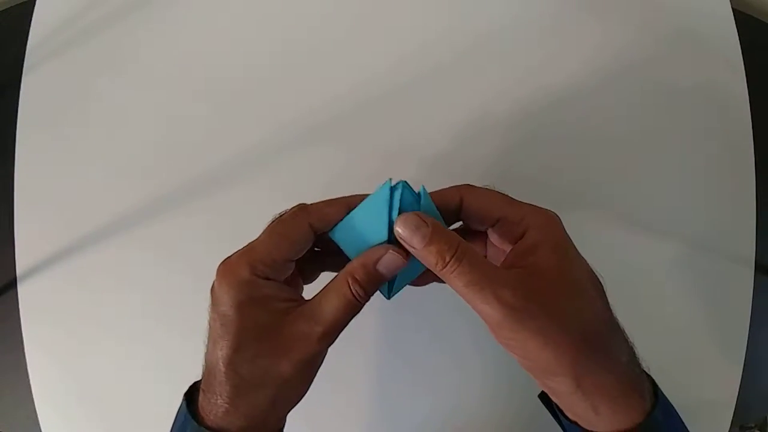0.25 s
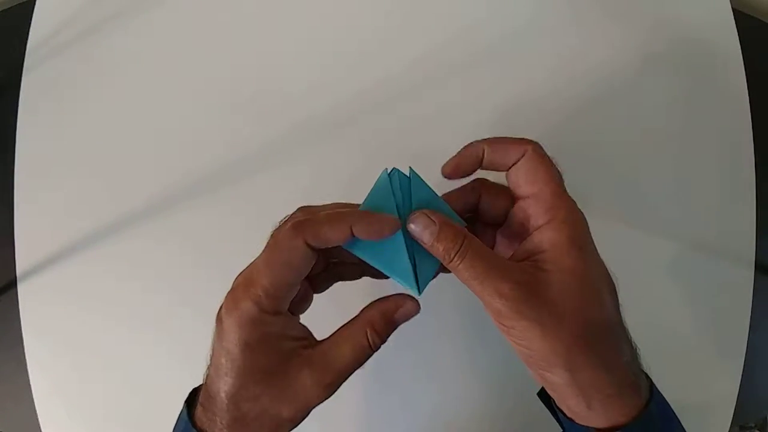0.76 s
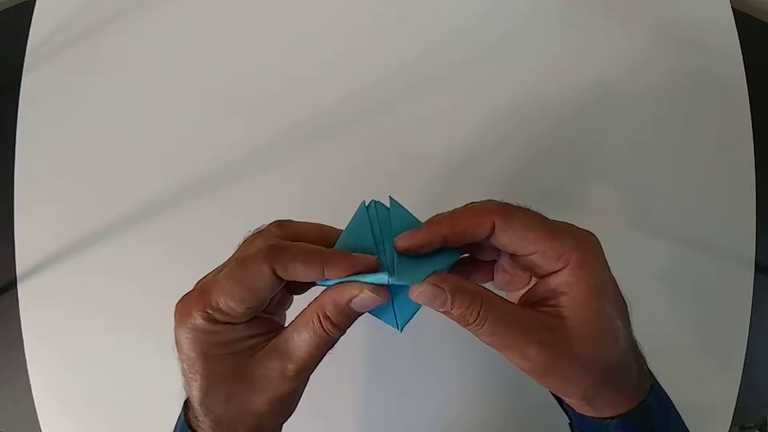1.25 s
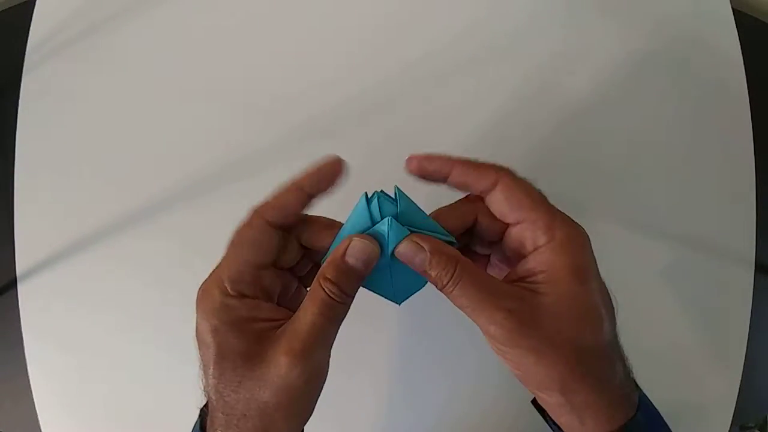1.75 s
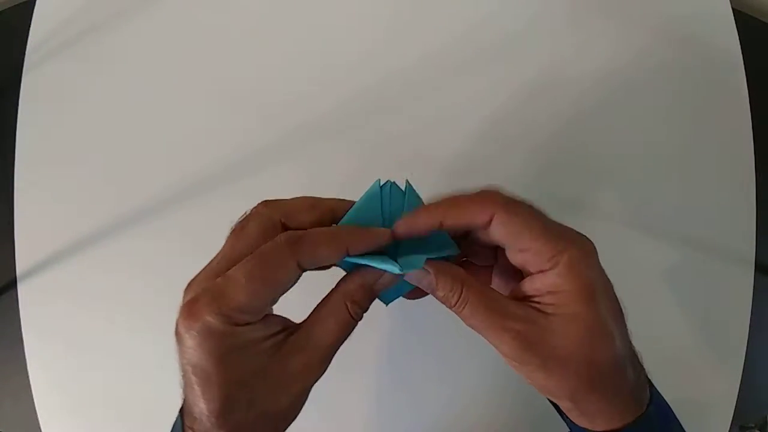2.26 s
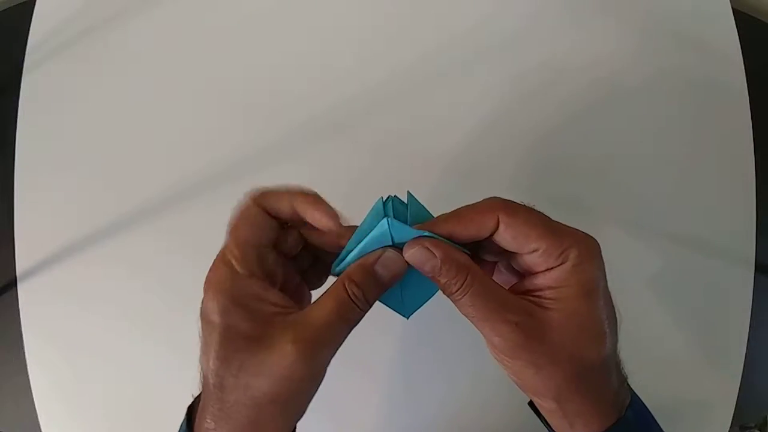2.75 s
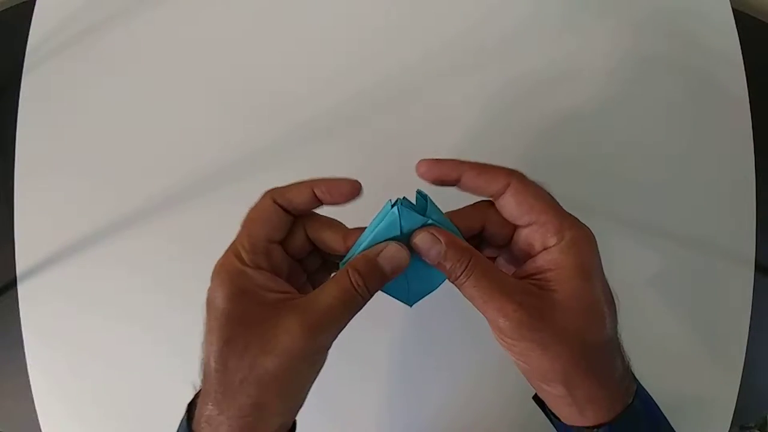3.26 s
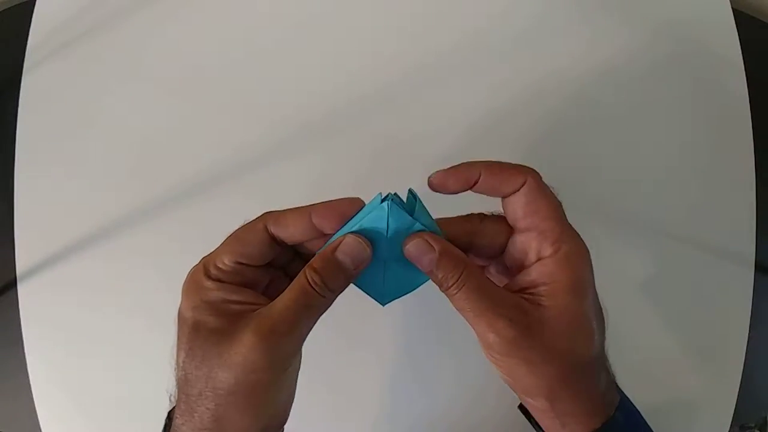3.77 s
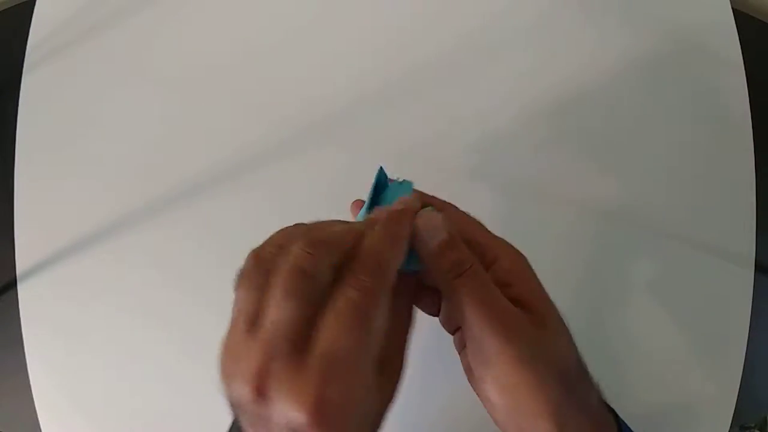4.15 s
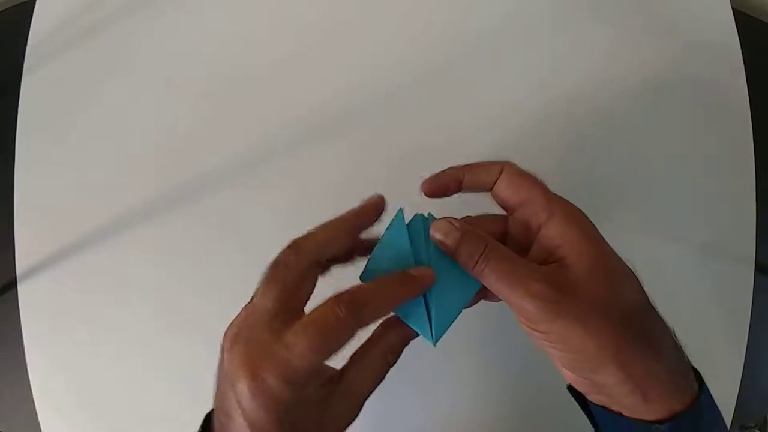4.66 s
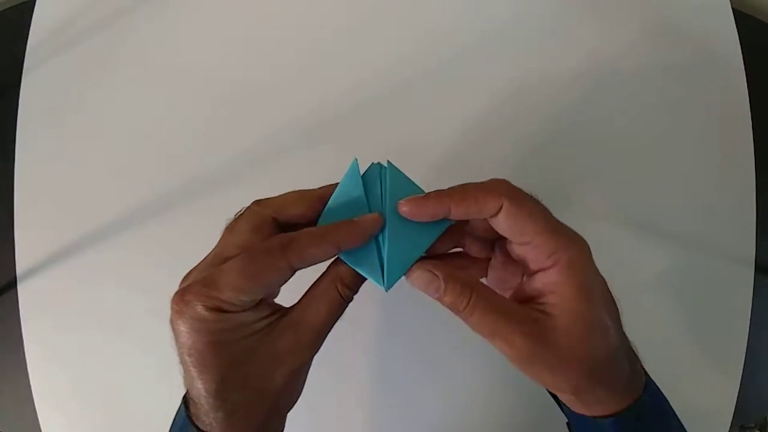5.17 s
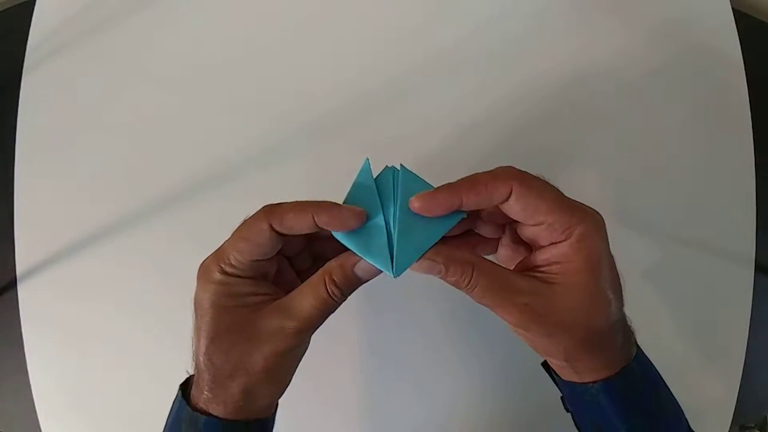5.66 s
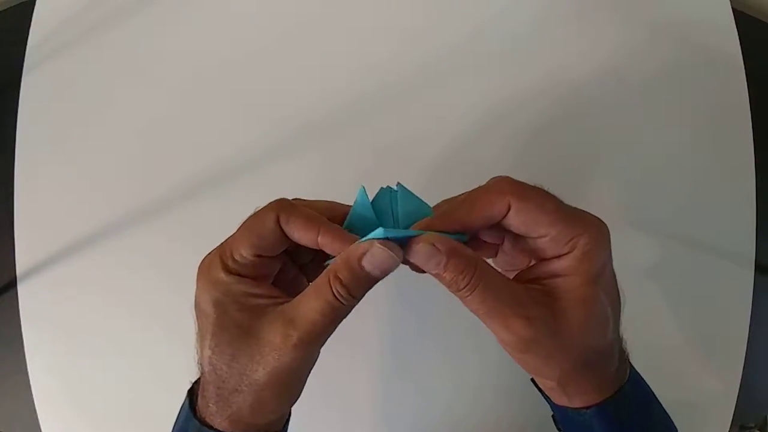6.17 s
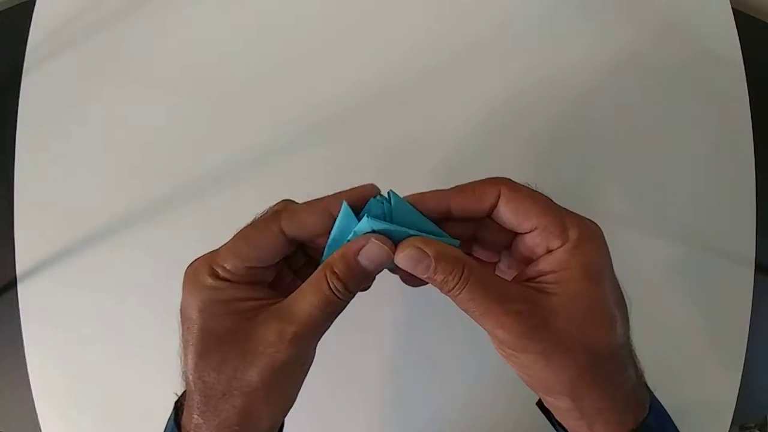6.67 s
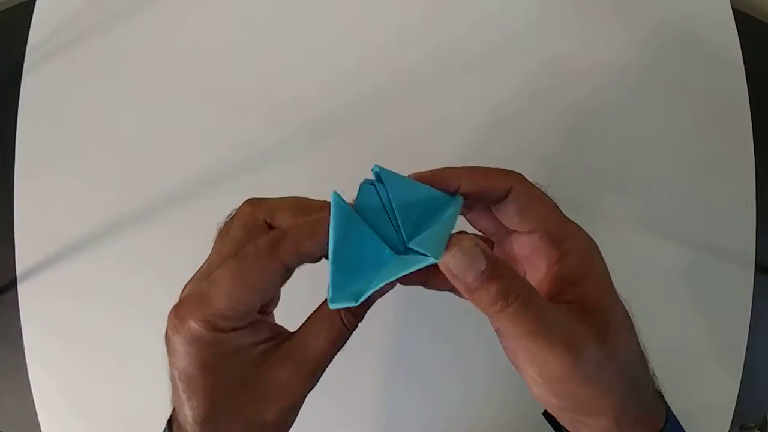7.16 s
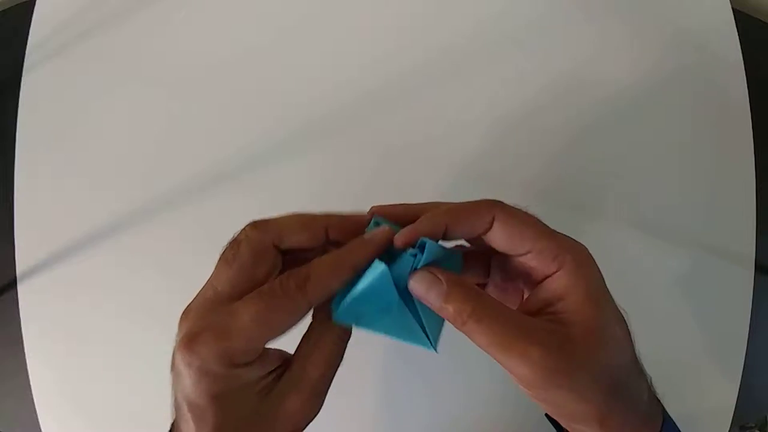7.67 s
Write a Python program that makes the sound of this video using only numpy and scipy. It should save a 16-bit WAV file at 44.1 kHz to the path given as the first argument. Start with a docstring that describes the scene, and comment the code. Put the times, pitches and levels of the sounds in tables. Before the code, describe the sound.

A small piece of stiff paper is folded by hand just above a table. It gives short, crisp snaps and tiny crackles at uneven intervals, with soft swishes of fingertips sliding along the creases in between. Three sharper snaps stand out in the first half and another comes later, followed by a faint creak and more light rustling. The microphone is close overhead in a quiet, furnished room with faint ventilation rumble and hiss.

```python
"""A small sheet of stiff paper snaps and swishes as two hands fold it just above a table in a quiet room.
Buckling panels excite damped modes of the sheet; friction of fingertips along the creases makes the swish.
One slow squeeze creaks. The table reflects the sound and the furnished room adds a short reverberation.
Two microphone ports a few centimetres apart listen from above, the left with a bright resonance,
over faint ventilation rumble, mains hum and hiss."""
import sys
import numpy as np
from scipy import signal
from scipy.fft import rfft, irfft, next_fast_len
from scipy.io import wavfile

SR = 44100
rng = np.random.default_rng(int(sys.argv[2]) if len(sys.argv) > 2 else 0)


def file_out(sig):
    """Save sig as 16-bit WAV at sys.argv[1]."""
    # one column per channel
    cols = np.atleast_2d(sig).T
    # limit, then scale
    lim = np.clip(cols, -1, 1)
    pcm = np.round(lim * 32767).astype(np.int16)
    wavfile.write(sys.argv[1], SR, pcm)


N = 349272

# Buckling events: start_s, panel_db, panel_pitch_hz, thud_db, flap_db, crack_db, tick_db, left_over_right_db
BUCKLES = [(0.0922, -38, 1550, -49.5, -46, -52.5, -58, 1), (0.452, -10.5, 1620, -35, -9, -17, -10, 2.5),
           (0.7758, -50, 1530, -57, -69, -65, -64, 0.0), (0.9183, -34.5, 1787, -57, -63.5, -65, -62, 0),
           (0.9664, -44, 2020, -74, -43.0, -45, -33, 5),
           (1.2059, -31.5, 1420, -36.5, -42, -42.5, -54, -0.5), (1.286, -63.5, 1600, -54, -69, -60, -71, 2),
           (1.331, -54, 1570, -55.5, -55.5, -56, -50, 0), (1.4995, -57, 2156, -68.5, -46, -56.5, -70, 3),
           (1.7527, -47, 1310, -33.5, -48.5, -38.5, -61, 3.5),
           (1.777, -12, 2270, -41.5, -12.5, -26, -35, 3), (2.3071, -38.5, 1760, -52.5, -43, -45, -60, 0),
           (2.6375, -58.5, 1210, -57.5, -62.5, -71, -77, 2),
           (2.6629, -52.5, 1126, -53, -63.5, -68, -74, 3.5), (2.677, -53, 2180, -73, -53, -67, -62, -6),
           (2.7443, -57, 1970, -88, -52.5, -48, -65, -5.5), (2.794, -51, 1880, -48.5, -35, -44.5, -49, 0),
           (2.856, -48.0, 1990, -53, -38.5, -43, -49, 4), (2.934, -34, 2325, -43, -12, -5.5, -18.5, 4),
           (3.1935, -64, 1850, -81, -61, -59, -47.5, 2.5), (3.2833, -57.0, 1304, -48, -64, -60, -64, 1),
           (3.676, -34.5, 2360, -54.5, -42.5, -42, -47.5, -0.5),
           (3.7599, -51, 2150, -64, -40, -43, -53.0, 7), (3.9694, -48, 1360, -59, -55, -68, -64.5, 0),
           (3.9944, -63, 2420, -74.5, -43.5, -59, -55, 2), (4.0112, -48, 1694, -57.5, -38.5, -66, -66.0, 0),
           (4.3795, -61, 1950, -57, -41, -53, -62, 1), (4.6075, -48.5, 2170, -57, -66, -64, -51.5, -2),
           (4.7748, -45.5, 2160, -68, -52.0, -58, -59, 1.5),
           (4.8497, -35, 2180, -45, -27.5, -39, -42.5, -1), (4.8742, -32.5, 2090, -68, -34, -39, -43, 1),
           (5.3172, -44, 1885, -48, -52, -59.5, -58, 9), (5.816, -23, 1705, -38, -18, -12, -6, 3.5),
           (5.978, -24, 2365, -79, -39, -60, -64, 1.5), (6.0196, -77, 2170, -85.0, -51, -49, -48.5, 0),
           (6.52, -42.5, 2020, -44.5, -32.5, -26, -28.5, 14.5), (6.5667, -58, 2300, -69, -40, -40, -54, -6),
           (6.6352, -51, 2020, -51, -47, -57, -57, 2), (6.677, -52, 2030, -68, -56, -46, -47, 0.5),
           (6.7792, -70, 2287, -86, -35, -30.5, -32.5, 6.5),
           (7.0746, -28, 2023, -46.5, -29.5, -51.5, -51.5, 0.5), (7.543, -58, 1400, -48, -60, -61, -57, 2),
           (7.692, -56, 1290, -47.5, -64, -66, -66, 3)]
# Modes of the large panel: pitch_ratio, level_db
LARGE_PANEL_MODES = [(.85, -14.5), (1.0, -4), (1.2, -7)]
# Modes of small flaps, stiff creases, the bright tick high in the treble, and sheet and fingers as a # whole:
# pitch_hz, level_db
SMALL_FLAP_MODES = [(2700, -10), (3100, -2), (3600, -7.5), (4200, -8.5)]
CREASE_MODES = [(4800, -10), (5400, -2), (6100, 0), (6900, -9)]
TICK_MODES = [(8200, -8.5), (9100, 0), (9700, -10.5), (12200, -27), (14500, -23)]
WHOLE_SHEET_MODES = [(110, -22.5), (260, -18), (560, -8.5), (850, -9.5)]
RING_CYCLES, THUD_CYCLES = 14, 6
BUCKLE_LEAD_S = .00012   # the flip begins just before the snap is loud
SPOT_SPREAD_S = .00009   # modes radiate from different spots, so their travel times differ
SHEET_CUT_HZ = 946


def buckling_snaps(events):
    """Snap-through buckling: a panel flips in a stutter of slips that excites the sheet's modes."""
    start_s, panel_db, panel_hz, thud_db, flap_db, crack_db, tick_db, pan_db = events.T
    onsets = np.round((start_s - BUCKLE_LEAD_S) * SR).astype(int)
    port_gains = from_db(np.outer([.5, -.5], pan_db))
    ring_samples, thud_samples = 600, 2000
    slips = np.zeros((len(events), thud_samples))
    slips[:, 0] = 1
    late = rng.random((len(events), 160)) < .08   # smaller slips follow and die out within a few ms
    slips[:, 4:164] = late * rng.normal(0, .25, late.shape) * np.exp(-np.arange(160) / 45)
    slips /= np.linalg.norm(slips, axis=1, keepdims=True)
    spot_lags = rng.uniform(0, SPOT_SPREAD_S * SR, (len(events), 2, 16)).round().astype(int)
    sheet, thuds = np.zeros((2, 2, N + thud_samples))
    for k, slip in enumerate(slips):
        modes = [(ratio * panel_hz[k], db + panel_db[k]) for ratio, db in LARGE_PANEL_MODES]
        modes += [(hz, db + flap_db[k]) for hz, db in SMALL_FLAP_MODES]
        modes += [(hz, db + crack_db[k]) for hz, db in CREASE_MODES]
        modes += [(hz, db + tick_db[k]) for hz, db in TICK_MODES]
        for m, (hz, db) in enumerate(modes):
            ringing = from_db(db) * paper_mode(slip[:ring_samples], hz, RING_CYCLES)
            for port in (0, 1):
                start = onsets[k] + spot_lags[k, port, m]
                sheet[port, start:start + ring_samples] += port_gains[port, k] * ringing
        thud = sum(from_db(db + thud_db[k]) * paper_mode(slip, hz, THUD_CYCLES)
                   for hz, db in WHOLE_SHEET_MODES)
        thuds[:, onsets[k]:onsets[k] + thud_samples] += port_gains[:, k:k + 1] * thud
    # acoustic short circuit: air flows round the edges of a small panel, so it radiates little bass
    bass_cut = signal.butter(3, SHEET_CUT_HZ, "high", fs=SR, output="sos")
    return (signal.sosfilt(bass_cut, sheet + 1e-18) + thuds)[:, :N]


def paper_mode(clicks, hz, cycles):
    """Two equal resonators in cascade, each losing 60 dB in `cycles`: an impulse swells to about 1."""
    t60_s = cycles / hz
    unit_peak = 2 * np.e * np.log(1000) / (t60_s * SR)
    return unit_peak * resonator(resonator(clicks, hz, t60_s), hz, t60_s)


def resonator(clicks, hz, t60_s):
    """Damped harmonic oscillator: each impulse starts an exponentially decaying sine."""
    radius, angle = from_db(-60 / (t60_s * SR)), 2 * np.pi * hz / SR
    return signal.lfilter([0, np.sin(angle)], [1, -2 * radius * np.cos(angle), radius ** 2], clicks + 1e-18)


# One tick of the creak: panel_db, panel_pitch_hz, thud_db, flap_db, crack_db, tick_db, left_over_right_db
CREAK_BUCKLE = (-59, 1452.5, -57, -62, -72.5, -71.5, 4.5)


def creak_events(start_s=6.33, ticks=10, gap_s=.018, unevenness=.35, spread_db=1.5):
    """Quasi-periodic buckling: a slowly squeezed fold gives a row of small snaps, uneven in gap and level."""
    chance = rng.uniform(-1, 1, (ticks, 2))
    times_s = start_s + gap_s * (np.arange(ticks) + unevenness * chance[:, 0])
    is_level = np.array([1, 0, 1, 1, 1, 1, 0])
    return np.column_stack([times_s, CREAK_BUCKLE + spread_db * chance[:, 1:] * is_level])


# Finger strokes: full_pressure_s, swell_s, hold_s, fade_s, hiss_db, body_db, rumble_db, sheen_db
FINGER_STROKES = [(0, .05, 0.049, 0.26, -57.5, -60.5, -64, -66),
                  (.097, 0.1, 0.00079, 0.06, -71, -58, -55, -57.5),
                  (.185, 0.039, 0.023, 0.1, -64.5, -56.5, -63, -60.5),
                  (0.419, 0.094, 0.025, 0.56, -60, -51, -66, -58.5),
                  (0.663, 0.1, 0.073, 0.053, -57.5, -61.5, -108, -54.5),
                  (0.79, 0.078, 0, 0.04, -88, -67, -62.5, -66),
                  (0.933, 0.013, 0.02, 0.13, -67, -57, -69.5, -65),
                  (1.015, 0.1, 0.0082, 0.048, -56.5, -48.5, -68.5, -53.5),
                  (1.243, 0.079, 0, 0.0087, -71, -60, -60, -65),
                  (1.341, 0.019, 0.0023, 0.039, -71, -69, -73, -64),
                  (1.433, .013, 0.031, 0.032, -57.5, -64.5, -91, -57),
                  (1.644, 0.016, 0.11, 0.05, -57, -64.5, -73.5, -55),
                  (1.75, 0.051, 0.024, 0.31, -78, -67, -67, -87),
                  (1.859, 0.11, 0, 0.065, -66, -57.5, -64.5, -71),
                  (1.976, 0.12, 0.014, 0.039, -63, -65, -100, -62.5),
                  (2.049, 0.012, 0.027, 0.091, -59.5, -60.5, -84, -56),
                  (2.13, 0.031, 0.003, 0.052, -57, -59.5, -74, -60),
                  (2.169, .01, 0.047, 0.025, -74, -69, -68.5, -74.5),
                  (2.251, 0.016, 0.076, .11, -61.5, -60, -72, -60),
                  (2.678, 0.039, 0, 0.1, -73, -69, -67, -82),
                  (2.794, 0.027, 0.0038, 0.028, -50.5, -52, -59.5, -51.5),
                  (2.92, 0.06, 0.02, 0.044, -43.5, -43, -66, -45),
                  (3.016, .05, 0, 0.065, -55.5, -80.5, -95, -88),
                  (3.196, .04, 0.0016, .3, -81, -86, -73, -80),
                  (3.349, 0.039, 0.011, 0.18, -74, -72.5, -80.5, -72.5),
                  (3.411, 0.076, 0, 0.21, -69, -71, -71.5, -61.5),
                  (3.601, 0.072, 0.0064, 0.015, -60, -65.5, -67.5, -65.5),
                  (3.69, 0.029, 0.026, 0.048, -50.5, -53, -68.5, -58.5),
                  (3.764, 0.041, 0, 0.02, -46.5, -50.5, -58.5, -48),
                  (4.014, 0.038, 0, 0.025, -60.5, -57.5, -60, -57),
                  (4.131, 0.037, .03, .1, -74.5, -73.5, -77, -73),
                  (4.188, 0.026, 0.011, 0.16, -67, -64, -65, -59.5),
                  (4.318, 0.065, 0.0055, 0.049, -49.5, -46.5, -77, -48.5),
                  (4.418, 0.033, 0.0052, 0.073, -87, -55.5, -67.5, -61.5),
                  (4.513, .07, 0.002, 0.057, -52.5, -53, -74, -55),
                  (4.604, 0.057, 0, 0.14, -65.5, -60.5, -73, -68),
                  (4.709, 0.32, 0.0046, 0.023, -74.5, -65.5, -80.5, -71),
                  (4.778, 0.025, 0.0023, 0.034, -77, -64, -67, -72),
                  (4.856, 0.0084, 0.0038, 0.12, -58, -47.5, -60, -70),
                  (4.897, 0.034, 0, 0.12, -52.5, -47.5, -63.5, -53),
                  (4.979, 0.076, 0.092, 0.053, -61.5, -65.5, -70.5, -62.5),
                  (5.196, 0.066, 0, 0.097, -74.5, -76, -66, -79.5),
                  (5.309, 0.018, 0, 0.081, -50.5, -56.5, -65.5, -52),
                  (5.39, 0.054, 0.087, 0.071, -74, -73, -82.5, -78),
                  (5.702, .06, 0.0024, 0.078, -84, -69.5, -89.5, -72),
                  (5.814, 0.0054, 0.068, 0.036, -54, -50.5, -67, -46.5),
                  (5.939, 0.19, 0, 0.19, -62.5, -74, -77, -66),
                  (6.084, 0.012, 0, 0.017, -54.5, -57.5, -78, -52),
                  (6.163, 0.013, 0.0013, 0.046, -56.5, -76, -78, -52),
                  (6.191, 0.031, 0.0027, 0.023, -54, -51, -57, -46.5),
                  (6.509, 0.022, 0.021, 0.017, -43.5, -48, -56.5, -44.5),
                  (6.544, 0.11, 0.029, 0.033, -61, -58, -75, -70),
                  (6.638, 0.013, 0, 0.087, -64, -77, -72, -66),
                  (6.751, 0.027, 0.013, 0.051, -65.5, -60.5, -67, -65),
                  (7.083, .05, 0.048, 0.024, -49, -57, -64, -52),
                  (7.18, .05, 0.065, 0.12, -73.5, -79, -75, -62),
                  (7.21, 0.043, 0, .03, -82, -75.5, -65, -79),
                  (7.34, 0.07, 0, 0.042, -57, -66.5, -98.5, -57),
                  (7.479, 0.026, 0.024, 0.054, -50, -55.5, -67.5, -58.5),
                  (7.542, 0.041, 0, 0.019, -77, -62.5, -63.5, -57.5),
                  (7.64, .06, 0.13, 0.28, -82, -71, -73, -85),
                  (7.752, 0.08, 0.004, 0.017, -52.5, -66, -75, -51),
                  (7.801, 0.026, 0, 0.092, -72.5, -88, -77.5, -71.5)]
# Fingers merely holding the sheet: hiss_db, body_db, rumble_db, sheen_db
HOLDING_LEVELS = (-85, -85.5, -88, -87)


def stroke_envelopes(edge_db=20, edge_curve=1.03, shortest_s=.004):
    """Incoherent addition: strokes swell and fade by edge_db in their set times and sum in power."""
    t = np.arange(0, N + 64, 64) / SR
    full_s, swell_s, hold_s, fade_s, *levels_db = np.transpose(FINGER_STROKES)[..., None]
    early = np.maximum(full_s - t, 0) / np.maximum(swell_s, shortest_s)
    late = np.maximum(t - full_s - hold_s, 0) / np.maximum(fade_s, shortest_s)
    shape = from_db(-edge_db * (early + late) ** edge_curve)
    powers = [np.sum((from_db(db) * shape) ** 2, axis=0) + from_db(holding_db) ** 2
              for db, holding_db in zip(levels_db, HOLDING_LEVELS)]
    return [np.interp(np.arange(N) / SR, t, np.sqrt(power)) for power in powers]


# Friction spectra: frequency_hz, relative_density_db
CREASE_HISS = [(4000, -3.5), (4800, 1.5), (5800, 4.5), (6800, -4), (7400, -13.5)]
PAPER_BODY = [(1000, -20), (1600, -1), (2200, 3), (3000, 8.5), (4000, 5.5), (5000, -6)]
FINGERTIP_RUMBLE = [(50, -21.5), (120, -2.5), (250, 0.5), (400, 1.5), (700, -0.5), (1100, 3.5),
                    (1500, -8.5), (2000, -13)]
FIBRE_WHISPER = [(10000, -75), (11000, 25.5), (13000, 33.5), (14500, 29), (15800, 35.5)]
EDGE_SHEEN = [(7000, -10.5), (8000, -2.5), (9200, 1.5), (10000, -5.5), (10800, -18.5)]


def finger_friction(crackles_per_s=55, crackle_db=12.5, flicker_db=3.27, whisper_db=-3, hiss_share=.45):
    """Friction noise: skin ridges catch the fibres thousands of times a second, in five noise bands."""
    hiss, body, rumble, sheen = stroke_envelopes()
    whisper = from_db(whisper_db) * hiss ** hiss_share * sheen ** (1 - hiss_share)
    # three contacts: one heard at both ports, and one that each port hears alone
    contacts = rng.standard_normal((3, N))
    contacts *= from_db(.96 * np.minimum(rng.exponential(1, (3, N)), 4))
    fibre_breaks = rng.random(N) < crackles_per_s / SR
    contacts[0] *= 1 + from_db(crackle_db) * fibre_breaks
    catches = contacts[0] + 1.2 * contacts[1:]
    bands = [(CREASE_HISS, hiss), (PAPER_BODY, body), (FINGERTIP_RUMBLE, rumble),
             (FIBRE_WHISPER, whisper), (EDGE_SHEEN, sheen)]
    return sum(envelope * from_db(flicker_db * drift(17)) * colour(catches, spectrum)
               for spectrum, envelope in bands)


def table_reflection(paper, lag_s=.0015, level_db=-9):
    """Specular reflection: the table top returns a weaker, delayed copy of the sound."""
    return from_db(level_db) * np.array([delay(side, lag_s) for side in paper])


# Reverberation time of the furnished room: frequency_hz, t60_s
ROOM_DECAY = [(300, 0.16), (1500, 0.16), (4000, 0.14), (8000, 0.12), (14000, 0.098)]


def reverberation(paper, first_wall_s=.008, nearby_db=-3.5):
    """Diffuse field: dense echoes decay band by band; hands and table scatter first, then the walls."""
    t = np.arange(SR // 2) / SR
    edges_hz = 200 * 2.0 ** np.arange(8)
    white, echoes = rng.standard_normal((2, len(t))), 0
    for low, high in zip(edges_hz, np.minimum(edges_hz[1:], 20000)):
        band = signal.sosfilt(signal.butter(2, [low, high], "band", fs=SR, output="sos"), white)
        t60_s = at_hz(ROOM_DECAY, np.sqrt(low * high))
        echoes = echoes + band * from_db(-60 * t / t60_s)
    echoes *= np.where(t < first_wall_s, from_db(nearby_db) * (t > .002), 1)
    echoes /= np.sqrt(np.sum(echoes ** 2) / 2)
    return signal.fftconvolve(paper, echoes, axes=1)[:, :N]


# Ventilation rumble and microphone hiss: frequency_hz, relative_density_db
NOISE_FLOOR = [(12, -43.5), (20, -2), (55, 7), (86, 7), (127, 2.5), (459, -9), (897, -13.5), (2140, -13),
               (2600, -16), (4420, -17.5), (7110, -21.5), (9140, -17.5), (10500, -26), (14300, -15.5),
               (16000, -20)]
# Likeness of that noise at the two ports: frequency_hz, correlation
PORT_CORRELATION = [(60, 0.16), (300, 0.6), (1000, 0.57), (3000, 0.13), (8000, .01)]


def room_tone(level_db=-70.5):
    """Partial coherence: rumble and hiss have one part in phase at both ports and one in antiphase."""
    mid, side = rfft(rng.standard_normal((2, N)))
    hz = np.maximum(np.arange(N // 2 + 1) * SR / N, 1)
    alike = at_hz(PORT_CORRELATION, hz)
    pair = np.sqrt(1 + alike) * mid + np.sqrt(1 - alike) * side * [[1], [-1]]
    noise = irfft(pair * from_db(at_hz(NOISE_FLOOR, hz)) * (hz > 15), N)
    return from_db(level_db + .8 * drift(4)) * unit_rms(noise)


# Mains harmonics: pitch_hz, median_rms_db
HUM_HARMONICS = [(60, -89.5), (120, -84)]


def mains_hum(waver_db=3):
    """Harmonic series: the mains frequency and its octave, each wavering in level."""
    t = np.arange(N) / SR
    return sum(np.sqrt(2) * from_db(db + waver_db * drift(3.6)) * np.sin(2 * np.pi * hz * t)
               for hz, db in HUM_HARMONICS)


def from_db(db):
    """Decibels to amplitude ratio."""
    return 10 ** (np.asarray(db) / 20)


def unit_rms(x):
    """Normalisation to rms 1."""
    return x / np.sqrt(np.mean(x ** 2) + 1e-20)


def at_hz(table, hz):
    """Interpolation on a log-frequency axis."""
    table_hz, values = np.transpose(table)
    return np.interp(np.log(hz), np.log(table_hz), values)


def drift(bandwidth_hz):
    """Low-passed noise: a slow random fluctuation of rms 1."""
    step = 40   # samples
    pole = np.exp(-2 * np.pi * bandwidth_hz * step / SR)
    white = rng.standard_normal(N // step + 2002)
    slow = signal.lfilter([1], [1, -2 * pole, pole * pole], white)[2000:]
    return np.interp(np.arange(N) / step, np.arange(len(slow)), unit_rms(slow))


def colour(x, spectrum):
    """Source-filter shaping to rms 1; the spectrum falls 48 dB per octave beyond its ends."""
    size = next_fast_len(N)
    hz = np.maximum(np.arange(size // 2 + 1) * SR / size, 1)
    octaves_outside = np.abs(np.log2(hz / np.clip(hz, spectrum[0][0], spectrum[-1][0])))
    gain = from_db(at_hz(spectrum, hz) - 48 * octaves_outside)
    return unit_rms(irfft(rfft(x, size) * gain, size)[..., :N])


def delay(x, seconds):
    """Propagation delay, in whole samples."""
    lag = round(seconds * SR)
    return np.concatenate([np.zeros(lag), x[:N - lag]])


def scene(port_lag_s=.0001, left_over_right_db=1.5, room_db=-9):
    """Superposition at two ports: direct paper sound, table reflection, reverberation and background."""
    paper = buckling_snaps(np.vstack([BUCKLES, creak_events()])) + finger_friction()
    left, right = paper + table_reflection(paper)
    balance = from_db([[left_over_right_db / 2], [-left_over_right_db / 2]])
    near = balance * np.array([left, delay(right, port_lag_s)])
    return near + from_db(room_db) * reverberation(paper) + room_tone() + mains_hum()


def record(dry, port_hz=9100, width_hz=3000, lift_db=4, overload=.88, cutoff_hz=16400):
    """Port resonance lifts a band on the left and lowers it on the right; clipping and a low-pass follow."""
    resonance = signal.lfilter(*signal.iirpeak(port_hz, port_hz / width_hz, fs=SR), dry)
    ports = dry + (from_db([[lift_db], [-lift_db]]) - 1) * resonance
    clipped = np.clip(ports, -overload, overload)
    return signal.sosfilt(signal.cheby2(12, 50, cutoff_hz, fs=SR, output="sos"), clipped)


dry = scene()
out = record(dry)
file_out(out)
```